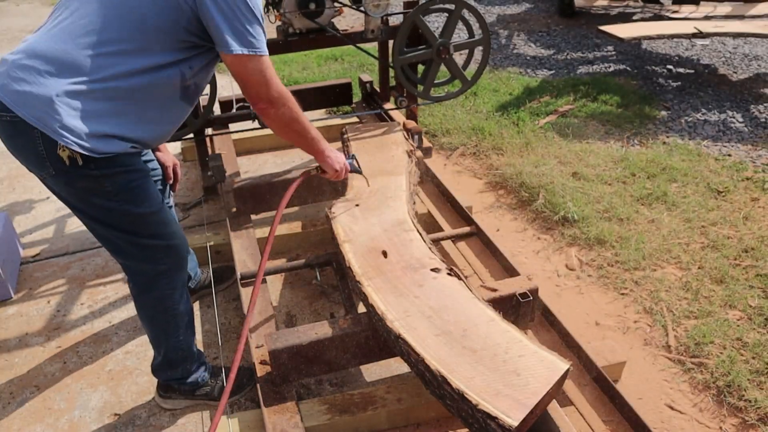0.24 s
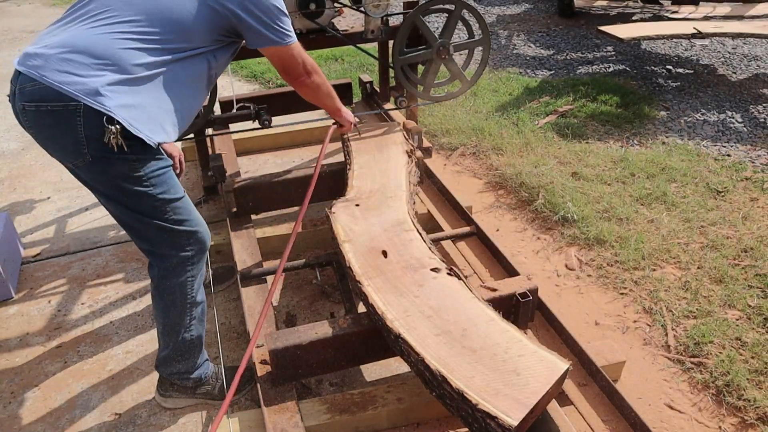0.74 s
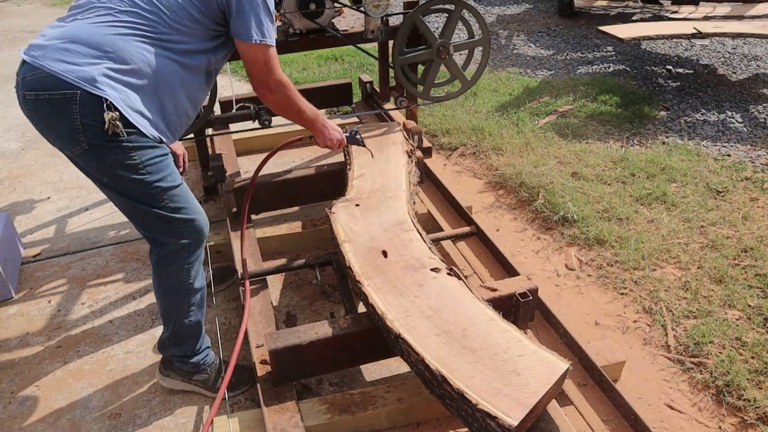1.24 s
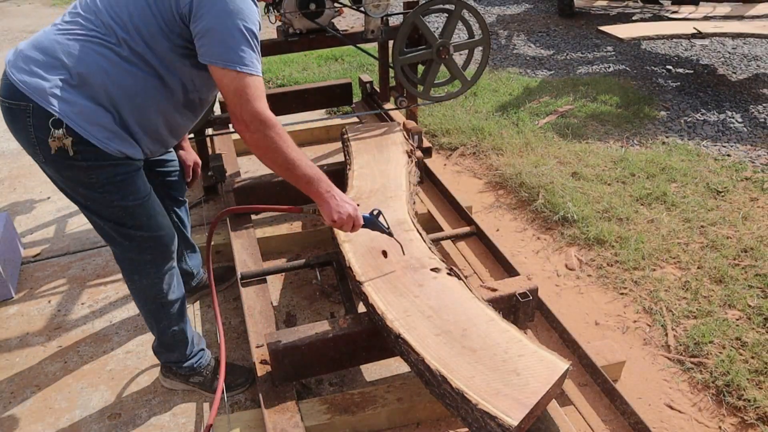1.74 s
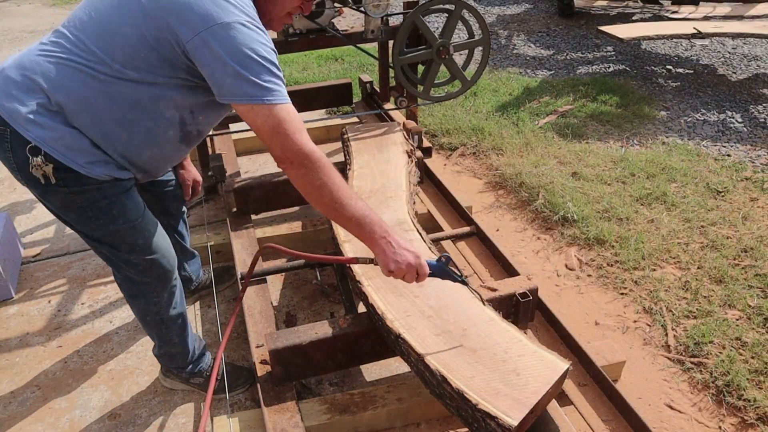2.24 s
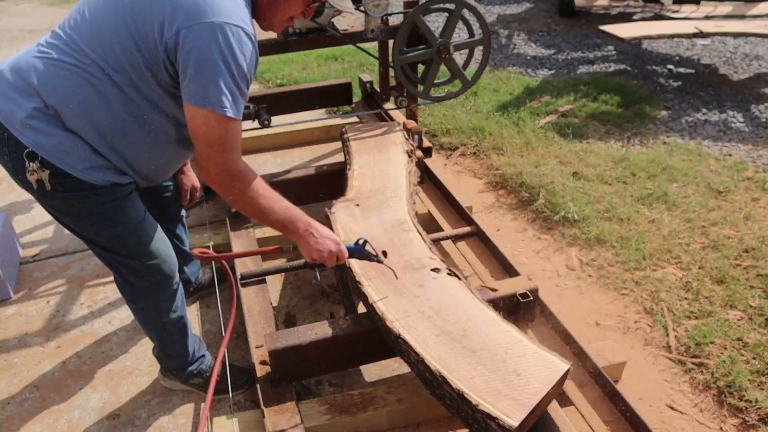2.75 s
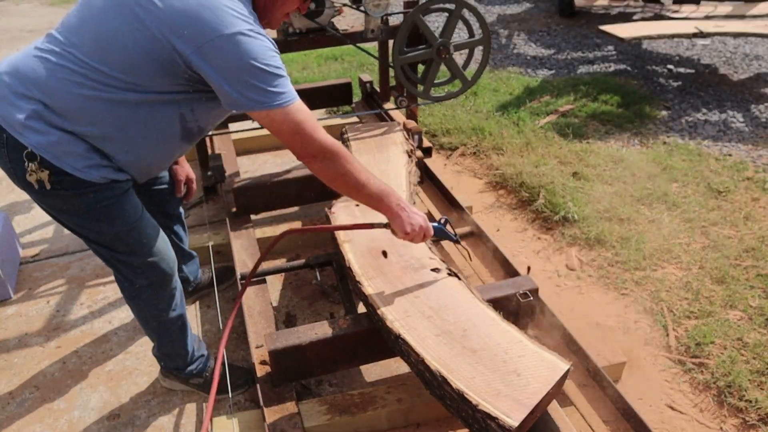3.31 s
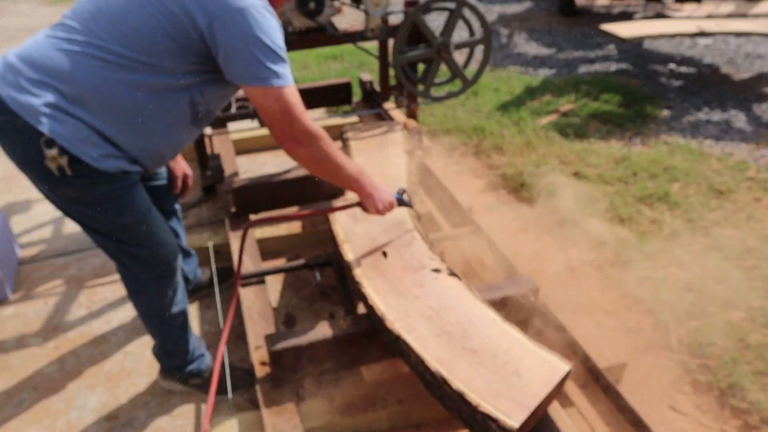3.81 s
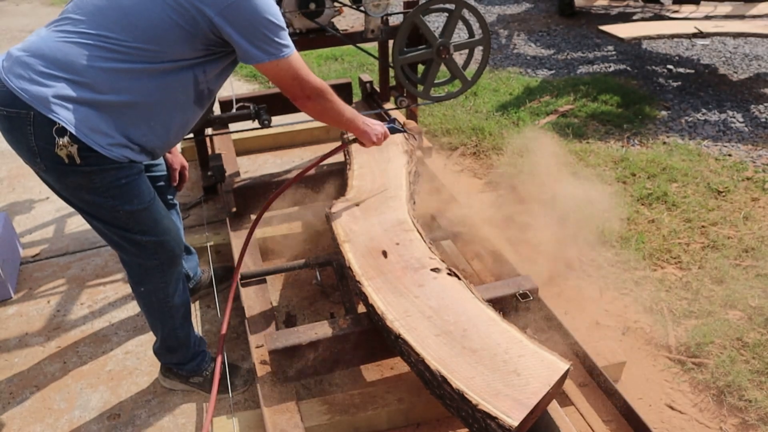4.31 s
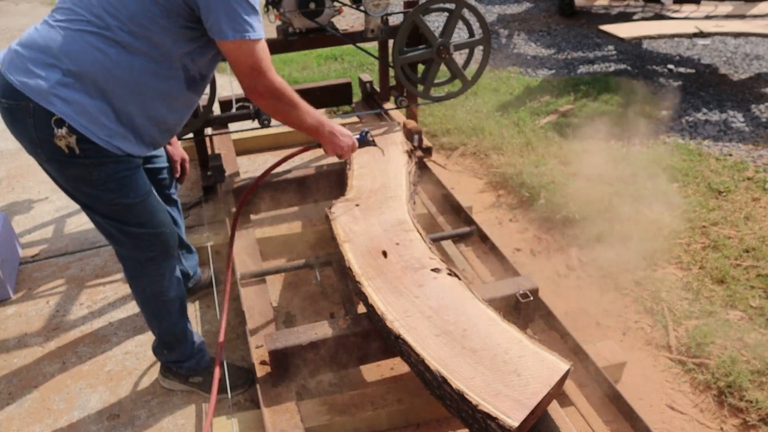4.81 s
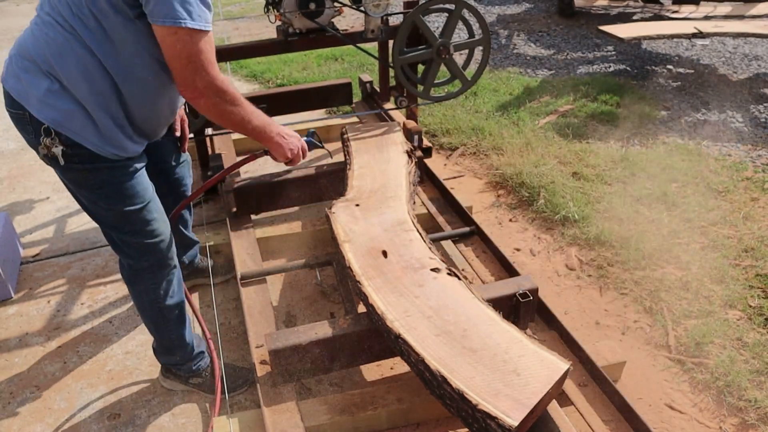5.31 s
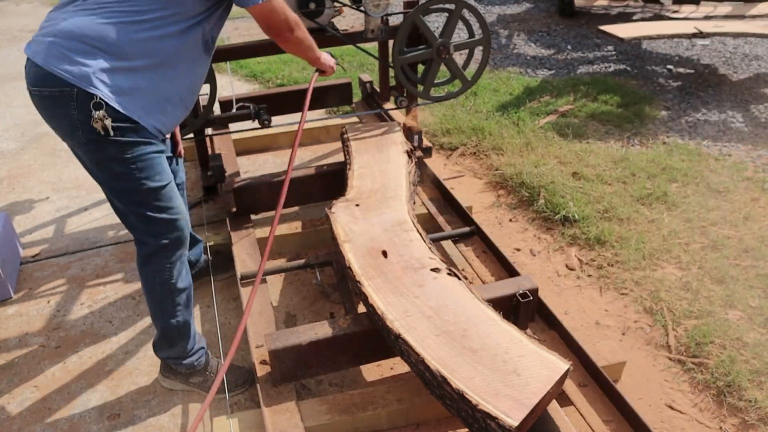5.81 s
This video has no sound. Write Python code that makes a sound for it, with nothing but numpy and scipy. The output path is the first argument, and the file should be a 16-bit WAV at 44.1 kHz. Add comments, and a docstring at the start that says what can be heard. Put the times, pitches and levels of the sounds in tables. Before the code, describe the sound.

Compressed air rushes and roars across sawn wood, hooting in hollows of a steel bed, stops, spurts briefly, and hisses again.

```python
"""A hissing air jet is already blowing: a blow gun sweeps sawdust off a plank on an outdoor sawmill.
One long blast is followed by a short one, then by another that is still sounding at the end.
Shaped noise makes the nozzle's hiss, the plume's rush and the roar on the wood; random clicks make loose grit.
Tuned noise flares on edges, hoots in hollows of the steel bed and howls along its channels.
Stray air thumps the microphone; the yard answers faintly over a distant drone."""
import sys
import numpy as np
from scipy import signal
from scipy.fft import rfft, irfft, next_fast_len
from scipy.io import wavfile
from scipy.ndimage import uniform_filter1d, map_coordinates

SR = 44100
rng = np.random.default_rng(int(sys.argv[2]) if len(sys.argv) > 2 else 0)


def digitize_waveform(pressure):
    """Quantize a signal to 16-bit integers and store it at the path in sys.argv[1].

    Rows of a 2-D input are taken as channels; values are limited to [-1, 1].
    """
    field = np.atleast_2d(pressure).T
    bounded = np.clip(field, -1, 1)
    quanta = np.round(bounded * 32767).astype(np.int16)
    wavfile.write(sys.argv[1], SR, quanta)


N = 267246  # length in samples, about 6 s


def amp(db):
    """Turn decibels into a gain."""
    return 10 ** (np.asarray(db) / 20)


def unit(x):
    """Scale to an average (rms) strength of 1."""
    return x / np.sqrt(np.mean(x ** 2) + 1e-20)


def along(points, hz):
    """Read between (pitch_hz, value) points on a log pitch axis."""
    f, v = np.transpose(points)
    return np.interp(np.log(hz + 1), np.log(f + 1), v)


def clock():
    """The time of every sample, in seconds."""
    return np.arange(N) / SR


def swell(s, half, order=2):
    """A rise and fall around time s: order 1 is a spike, 2 a bell, higher orders a plateau."""
    return np.exp(-.5 * abs((clock() - s) / half) ** order)


def wobble(rate):
    """A smooth random curve with rate new random values a second."""
    knots = rng.standard_normal(int(N * rate / SR) + 4)
    return map_coordinates(knots, [clock() * rate])


def filtered(x, response):
    """Strengthen or weaken each pitch in x by response(hz)."""
    m = next_fast_len(N + 8192)
    spectrum = rfft(x, m) * response(np.fft.rfftfreq(m, 1 / SR))
    return irfft(spectrum, m)[..., :N]


def pair(alike):
    """White stereo noise; alike lists (pitch_hz, likeness of left and right: 0 unrelated, 1 the same)."""
    def mid_and_side(hz):
        turn = np.arccos(np.clip(along(alike, hz), -1, 1)) / 2
        return np.array([np.cos(turn), np.sin(turn)])

    mid, side = filtered(rng.standard_normal((2, N)), mid_and_side)
    return np.array([mid + side, mid - side])


def rush(colour, alike):
    """Stereo noise of rms 1, coloured by (pitch_hz, level_db) points."""
    return unit(filtered(pair(alike), lambda hz: amp(along(colour, hz))))


def resonances(rows, alike):
    """Turbulent air swells in one resonance for each row."""
    air, out = pair(alike), np.zeros((2, N))
    for s, half, hz, width, db, shape in rows:
        # two passes narrow the peak, so each pass is made wider
        b, a = signal.iirpeak(hz, hz / min(1.49 * width, SR / 4), SR)
        once = signal.lfilter(b, a, air)
        ringing = unit(signal.lfilter(b, a, once))
        out += amp(db) * swell(s, half, shape) * ringing
    return out


# trigger pulls: (start_s, end_s)
TRIGGER = [(-.1, 4.808), (5.047, 5.202), (5.451, 6.2)]


def valve(opening_s=0.028, closing_s=0.033):
    """Air flow from 0 to 1 as the trigger is squeezed and let go."""
    t, flow = clock(), 0
    for on, off in TRIGGER:
        rise, fall = (t - on) / opening_s, (off - t) / closing_s
        flow = flow + np.clip(np.minimum(rise, fall), 0, 1)
    return flow


# the jet as the gun turns to and from the listener, before the trims in jet();
# one list for each blast: (time_s, nozzle_hiss_db, plume_rush_db)
AIM = [
    [(0, -29, -30.5), (.92, -28, -32.5), (1.06, -29.5, -31.5), (1.37, -26.5, -31.5), (1.67, -30, -28.5),
     (1.85, -29, -30), (2.28, -26.5, -27), (2.52, -28, -29.5), (2.64, -27, -28), (2.76, -31.5, -32),
     (3.12, -28, -31.5), (3.26, -31.5, -32.5), (3.52, -29.5, -35), (3.7, -29, -35), (4.0, -36, -30.5),
     (4.14, -40, -30), (4.18, -32, -37.5), (4.41, -31, -35), (4.66, -25.5, -33.5), (4.8, -28, -33)],
    [(5.06, -28.5, -30), (5.1, -27, -31), (5.15, -26, -30.5), (5.2, -21, -26.5)],
    [(5.48, -20.5, -29.5), (5.7, -26, -31.5), (5.81, -24, -30.5), (5.96, -28, -32.5), (6.06, -26, -30)],
]


def aim():
    """Nozzle and plume levels in dB, gliding as the gun turns."""
    s, *levels = np.concatenate(AIM).T
    return [np.interp(clock(), s, db) for db in levels]


# relative strength of each pitch in the fine hiss and in the larger rush: (pitch_hz, level_db)
NOZZLE_COLOUR = [(2000, -35), (6000, -5.5), (8000, -1), (10000, 0.5), (11500, 0.5), (12800, 0),
                 (14000, -4.5), (16000, -13)]
PLUME_COLOUR = [(30, -24), (130, -7), (450, -8.5), (800, -10.5), (1500, -6.5), (2300, -4), (3000, -2),
                (3800, 0), (5500, -1.5), (7500, -2.5), (10000, -9.5), (16000, -22)]
# brief dips of the whole jet: (middle_s, half_length_s, change_db)
DUCKS = [(1.06, 0.023, -2), (2.706, 0.015, -13), (2.917, 0.015, -5.5), (3.872, 0.034, -3)]


def jet(on_wood, nozzle_db=-2.0, plume_db=2.0, flutter_db=0.79):
    """Fine eddies hiss at the nozzle, louder over the wood; larger ones rush further down the plume."""
    hiss_db, rush_db = aim()
    # the wood throws the hiss back: the lift nears 4.5 dB, and a roar of -39.5 dB gives half of that
    rebound_db = 4.5 * on_wood / (on_wood + amp(-39.5))
    duck_db = sum(db * swell(s, half) for s, half, db in DUCKS)

    # around 4.2 s the nozzle points away, so that its hiss arrives only by reflections
    averted = swell(4.2, half=0.29, order=4)
    direct = rush(NOZZLE_COLOUR, [(6000, 0.48), (12000, 0.68), (15000, 0.76)])
    scattered = rush(NOZZLE_COLOUR, [(6000, 0.36), (12000, 0.0)])
    hiss = np.sqrt(1 - averted) * direct + np.sqrt(averted) * scattered
    nozzle = amp(nozzle_db + hiss_db + rebound_db) * hiss

    plume_alike = [(100, 1.0), (600, 0.85), (2000, 0.55), (4000, 0.37), (7000, 0.85)]
    plume = amp(plume_db + rush_db) * rush(PLUME_COLOUR, plume_alike)
    return (nozzle + plume) * amp(duck_db + flutter_db * wobble(45))


# where the gun is, as how late the left port hears it: (time_s, lag_samples)
BEARING = [(0, -.55), (1.55, -0.35), (2.0, .85), (2.33, 1.4), (2.68, 0.68), (2.76, 0.15), (2.95, -0.64),
           (3.1, 0.17), (3.27, 1.25), (3.8, 1.47), (3.9, 0.67), (4.35, 0.58), (4.7, -0.93), (5.12, 0.54),
           (5.45, -1.3), (6.06, -0.51)]
# strength of the drifting patches, deepest while the gun works among the rails: (time_s, depth_db)
PATCHY = [(0, 2), (2.4, 0.5), (3.1, 2), (3.3, 4), (6, 1.5)]
# how much louder the left microphone port is: (pitch_hz, left_over_right_db)
PORTS = [(100, 0.5), (600, 0.5), (1500, 1.5), (2400, -2.5), (3600, 1), (7500, 0.5), (8500, 1), (9300, -0.5),
         (10200, 2), (12000, 2), (13500, 0.5), (15000, 2)]
# shading by the camera body: (pitch_hz, left_over_right_db per sample of lag)
SHADE = [(300, -0.5), (1200, -1.1), (2500, -1.5), (6000, -2.5), (8200, -2), (9300, 0.5), (15000, -1)]


def sweep(x):
    """The moving gun shifts between the ports; reflections off the bed colour it in drifting patches."""
    hz, t, z = signal.stft(x, SR, nperseg=1024)
    hz = hz[:, None]
    lag = np.interp(t, *np.transpose(BEARING))

    # random patches, smoothed over pitch and then over time
    field = uniform_filter1d(rng.standard_normal(z.shape[1:]), size=2, axis=0)
    field = unit(uniform_filter1d(field, size=7, axis=1))
    # long waves bend round the rails and stay even
    patches = amp(np.interp(t, *np.transpose(PATCHY)) * field * hz / (hz + 500))

    # half of the difference goes to each side
    left_db = (along(PORTS, hz) + along(SHADE, hz) * lag) / 2
    left = amp(left_db) * np.exp(-1j * np.pi * hz * lag / SR)
    placed = z * np.array([left, 1 / left]) * patches
    return signal.istft(placed, SR, nperseg=1024)[1][:, :N]


# how long the echo takes to fade by 60 dB: (pitch_hz, fade_s)
YARD_FADE = [(200, 0.31), (1500, 0.65), (6000, 0.55), (14000, 0.4)]
# how wide the echo is: (pitch_hz, side_over_mid_db)
YARD_WIDTH = [(200, 0), (1500, 2), (5000, 5), (13000, 5)]


def yard(x):
    """Fading noise makes a wide outdoor tail, the middle pitches lasting longest."""
    hz, t, z = signal.stft(rng.standard_normal((2, SR)), SR, nperseg=256)
    z = z * amp(-60 * t / along(YARD_FADE, hz)[:, None])
    wide = amp(along(YARD_WIDTH, hz) / 2)[:, None]
    mid, side = signal.istft(np.array([z[0] / wide, z[1] * wide]), SR, nperseg=256)[1]
    tail = np.array([mid + side, mid - side])
    tail = tail / np.linalg.norm(tail[0])
    return signal.fftconvolve(x.mean(0)[None], tail, axes=1)[:, :N]


# relative strength of each pitch in the drone: (pitch_hz, level_db)
DRONE_COLOUR = [(20, -8), (45, -11), (70, 3.5), (120, -2.5), (200, 2.5), (270, -6), (500, -9.5),
                (750, -3.5), (1000, -6), (1500, -14), (2500, -23.5), (8000, -32), (16000, -54)]


def drone(db=-48.5):
    """Distant machinery murmurs under everything as steady coloured noise."""
    return amp(db) * rush(DRONE_COLOUR, [(100, 1.0), (300, 0.98), (800, 0.32), (3000, 0)])


# swings of the wrist that carry the jet across the plank: (middle_s, half_length_s, roar_db)
PASSES = [(0.028, 0.045, -28), (0.228, 0.043, -30.5), (0.397, 0.033, -28), (0.53, 0.032, -26.5),
          (0.674, 0.034, -28.5), (0.822, 0.025, -29.5), (0.972, 0.023, -36.5), (1.15, 0.14, -45),
          (1.444, 0.2, -34), (1.545, 0.12, -28.5), (1.563, .006, -26), (1.721, 0.011, -23),
          (1.939, 0.005, -23), (2.024, 0.41, -30.5), (2.56, 0.11, -32.5), (2.575, 0.0064, -26.5),
          (2.837, 0.051, -30), (2.957, 0.025, -30), (2.998, .025, -35.5), (3.148, 0.055, -36.5),
          (4.084, 0.055, -34), (5.116, 0.026, -32.5), (5.8, 0.25, -48.5), (5.961, 0.024, -35.5)]


def contact():
    """How hard the jet bears on the plank: one rounded rise and fall for each pass."""
    power = sum((amp(db) * swell(s, half, order=3)) ** 2 for s, half, db in PASSES)
    return np.sqrt(power)


# relative strength of each pitch in the roar on the wood: (pitch_hz, level_db)
SPLASH_COLOUR = [(25, -20), (70, -4.5), (170, -1), (350, 0.5), (550, 1.5), (1100, 0.5), (1800, -1),
                 (3000, -6.5), (6000, -29), (16000, -41)]


def splash(sputter_db=3.5):
    """The jet breaks up on the wood in a sputtering roar."""
    roar = rush(SPLASH_COLOUR, [(70, 1.0), (200, 0.49), (500, 0.19), (1500, 0.2), (5000, 0.0)])
    return unit(roar * amp(sputter_db * wobble(350)))


def grit(ticks_per_s=220, db=-9, spread_db=7):
    """Loose chips tick against the wood: random clicks of uneven strength."""
    struck = rng.random(N) < ticks_per_s / SR
    ticks = struck * rng.choice([-1, 1], (2, N)) * amp(spread_db * rng.random(N))
    b, a = signal.butter(2, [500, 6000], "band", fs=SR)
    return amp(db) * unit(signal.lfilter(b, a, ticks))


# stray air hits the microphone: (middle_s, half_length_s, level_db)
PUFFS = [(.004, 0.0064, -30.5), (0.039, 0.0045, -23.5), (0.538, 0.014, -40), (1.564, 0.025, -37),
         (1.723, 0.0093, -34), (2.087, 0.0063, -34), (2.578, 0.0058, -26.5), (2.84, 0.0087, -29),
         (3.187, 0.003, -27.5)]
# relative strength of each pitch in a thump: (pitch_hz, level_db)
PUFF_COLOUR = [(20, -12), (55, -0.5), (150, 1.5), (300, -6), (700, -8.5), (3000, -33)]


def puffs():
    """Stray gusts thump on the microphone as short swells of low noise."""
    gusts = sum(amp(db) * swell(s, half) for s, half, db in PUFFS)
    return gusts * rush(PUFF_COLOUR, [(100, 0.97), (500, 0.4)])


# pockets of the bed that the jet sounds like stopped pipes:
# (middle_s, half_length_s, fundamental_hz, width_hz, fundamental_db, overtone_db)
HOLLOWS = [(1.52, 0.04, 330, 700, -43, -31.5), (2.706, 0.0065, 685, 300, -30, -40),
           (3.273, 0.05, 485, 70, -40, -49), (3.444, 0.054, 483, 150, -43.5, -46),
           (3.558, 0.061, 250, 220, -39.5, -53), (3.667, 0.029, 177, 30, -39, -53),
           (3.782, 0.05, 427, 330, -38.5, -45), (3.862, 0.027, 200, 200, -44, -46),
           (4.256, 0.092, 326, 300, -42.5, -45), (4.433, 0.086, 410, 700, -45.5, -43.5),
           (4.752, 0.034, 278, 55, -44.5, -41), (5.528, 0.053, 300, 130, -39.5, -60),
           (5.956, 0.069, 282, 200, -39, -43.5)]


def hollows(order=4):
    """Each pocket hoots at its fundamental and its first odd overtone, three times as high."""
    low = [(s, half, hz, width, db, order) for s, half, hz, width, db, _ in HOLLOWS]
    high = [(s, half, 3 * hz, width, db, order) for s, half, hz, width, _, db in HOLLOWS]
    return sum(resonances(rows, [(300, 1.0), (1500, 0.97)]) for rows in (low, high))


# the jet crosses an edge or a knot hole:
# (middle_s, half_length_s, centre_hz, width_hz, level_db, shape: 1 a spike, 2 a bell)
FLARES = [(1.566, 0.015, 3800, 5000, -21.5, 0.8), (1.727, 0.009, 4350, 3500, -23, 1.2),
          (1.941, 0.0045, 3730, 4200, -18, 0.77), (2.62, 0.022, 4500, 2500, -25.5, 2),
          (2.797, 0.004, 4200, 4000, -22.5, 1.7), (3.019, 0.0045, 3600, 1800, -20.5, 0.89),
          (3.199, 0.0084, 4200, 3200, -20.5, 1.1), (3.44, 0.022, 3000, 2200, -31.5, 1.5),
          (3.79, 0.021, 8800, 8000, -28, 2), (3.935, 0.022, 7950, 6000, -28, 1.8),
          (4.01, .05, 4140, 4500, -32.5, 2.3), (4.105, 0.042, 10200, 6000, -26.5, 4.2),
          (4.49, .03, 10500, 6000, -33, 2), (5.135, .035, 5970, 2800, -29.5, 2),
          (5.7, 0.049, 5900, 400, -34, 2)]


def flares():
    """Air torn on an edge or a knot hole flares up in a short burst around one pitch."""
    return resonances(FLARES, [(3000, 0.82)])


# channels beside the rail, whose resonances slide with the nozzle;
# one list for each: (time_s, centre_hz, width_hz, level_db)
CHANNELS = [
    [(3.16, 1100, 900, -54), (3.21, 1180, 1000, -33.5), (3.33, 1240, 900, -35.5), (3.44, 1400, 1300, -30.5),
     (3.5, 1300, 900, -38.5), (3.62, 1350, 700, -39), (3.71, 1300, 700, -57), (3.733, 1350, 600, -58),
     (3.742, 1350, 600, -32), (3.8, 1540, 300, -29.5), (3.832, 1390, 650, -34), (3.86, 1410, 890, -52)],
    [(3.49, 480, 200, -48), (3.525, 550, 200, -36), (3.59, 820, 250, -37.5), (3.635, 730, 220, -41),
     (3.672, 543, 130, -38.5), (3.70, 500, 150.5, -60)],
]


def channel(path, sputter_db=1.5, edge=1.28, slope=4):
    """Turbulence howls in a resonance that slides with the nozzle and falls steeply above its peak."""
    hz, t, z = signal.stft(pair([(300, 1.0), (1500, 0.93)]), SR, nperseg=1024)
    s, centre, width, level = np.transpose(path)
    centre, width = np.interp(t, s, centre), np.interp(t, s, width)
    hz = hz[:, None] + 1  # avoids dividing by zero

    detune = (hz - centre ** 2 / hz) / width
    steep_fall = 1 + (hz / (edge * centre)) ** (2 * slope)
    shape = 1 / np.sqrt(width * (1 + detune ** 2) * steep_fall)
    howl = unit(signal.istft(z * shape, SR, nperseg=1024)[1][:, :N])

    # silent before and after the path
    level_db = np.interp(clock(), s, level, left=-np.inf, right=-np.inf)
    return howl * amp(level_db + sputter_db * wobble(200))


# the plume rumbles in the frame at the head of the bed: (middle_s, half_length_s, level_db)
RUMBLES = [(5.577, 0.14, -46.5), (6.0, 0.12, -46.5)]
# relative strength of each pitch in the rumble: (pitch_hz, level_db)
RUMBLE_COLOUR = [(25, -20), (70, 0), (120, 2), (230, -2), (400, -12), (1000, -33)]


def rumble():
    """The slowest eddies of the plume swell against the frame as low noise."""
    swells = sum(amp(db) * swell(s, half, order=4) for s, half, db in RUMBLES)
    return swells * rush(RUMBLE_COLOUR, [(100, 1.0), (400, 0.95)])


def scene():
    """The trigger gates the jet and all it sets sounding; the yard, puffs and drone are added."""
    on_wood = contact()
    plank = on_wood * (splash() + grit())
    howls = sum(channel(path) for path in CHANNELS)
    air = jet(on_wood) + plank + hollows() + flares() + howls + rumble()
    flow = valve()
    echo = amp(-17) * yard(flow * air)
    return flow * sweep(air) + echo + puffs() + drone()


def record(dry, port_hz=11800, width_hz=2300, lift_db=6, top_hz=15900):
    """The microphone ports resonate in the treble; the camera cuts off all that lies above its band."""
    def response(hz):
        lift = amp(lift_db / (1 + (2 * (hz - port_hz) / width_hz) ** 2))
        cut = np.clip((top_hz - hz) / 100 + .5, 0, 1)  # a ramp 100 Hz wide
        return lift * cut

    return filtered(dry, response)


dry = scene()
out = record(dry)
digitize_waveform(out)
```